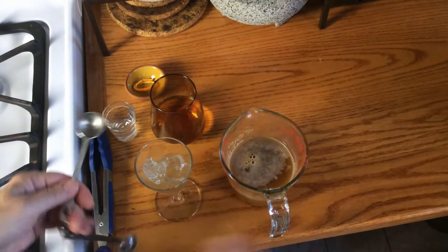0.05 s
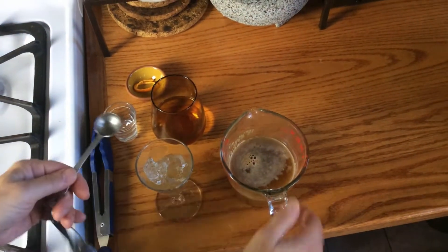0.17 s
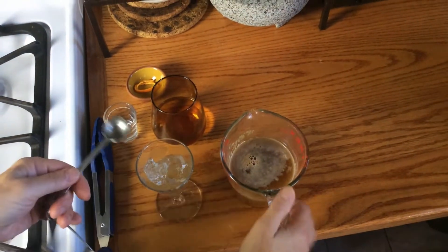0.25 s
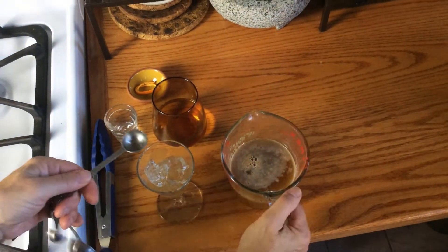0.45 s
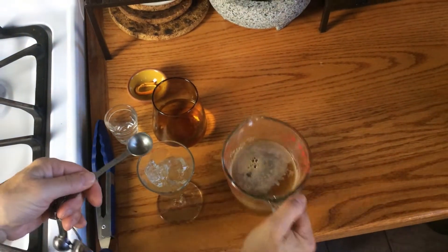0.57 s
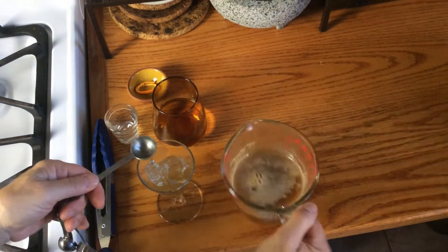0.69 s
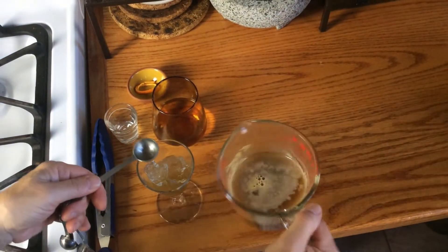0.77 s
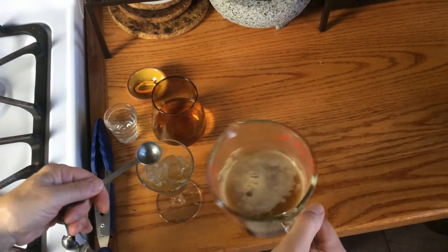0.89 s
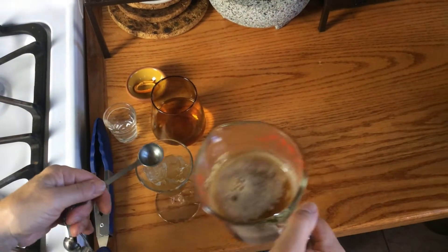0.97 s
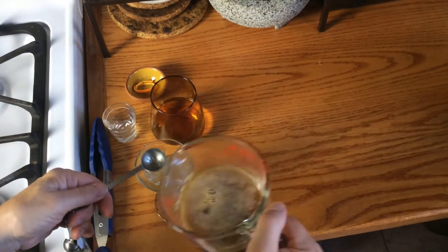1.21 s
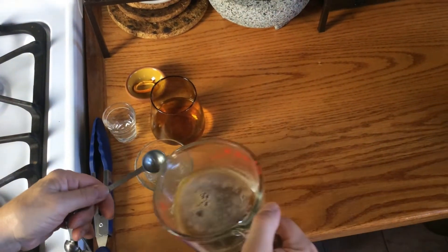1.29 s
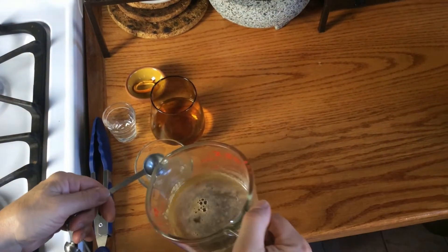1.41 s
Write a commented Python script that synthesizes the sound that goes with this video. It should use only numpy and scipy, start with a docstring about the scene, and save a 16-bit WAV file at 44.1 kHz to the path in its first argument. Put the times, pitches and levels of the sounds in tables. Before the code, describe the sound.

Metal measuring spoons jingle together, light ticks then three bright clinks, over a faint hum.

```python
"""A small kitchen, one microphone close to the counter. Steel measuring spoons swing together on their ring:
light ticks, then three bright clinks. Each contact clacks and sets the spoons ringing, the last loud one
a glass too, and the room answers briefly. Behind them a fridge-like motor hums over the room tone,
and a soft rustle swells as a glass pitcher is lifted."""
import sys
import numpy as np
from scipy import signal
from scipy.fft import rfft, irfft
from scipy.io import wavfile
from scipy.ndimage import uniform_filter1d

SR = 44100
rng = np.random.default_rng(int(sys.argv[2]) if len(sys.argv) > 2 else 0)


def inscribe(sig):
    """Save sig as 16-bit PCM at rate SR to the path in sys.argv[1].

    A 1-D sig is mono; a 2-D sig holds one channel per row.
    Samples are clipped to [-1, 1] before scaling.
    """
    pcm = np.round(np.clip(np.atleast_2d(sig).T, -1, 1) * 32767)
    wavfile.write(sys.argv[1], SR, pcm.astype(np.int16))


N = 63945

# room tone: frequency_hz, relative_db
AIR_SPECTRUM = [(25, -29.5), (45, -12), (80, 1), (130, -4), (210, 1.5), (300, -14.5), (500, -22.5),
                (1100, -25), (1600, -31), (3000, -43), (4000, -37.5), (5500, -46), (9000, -35.5),
                (11500, -46.5), (13000, -52.5), (15000, -79.5)]
# brief swells of its rumble: peak_s, boost_db
RUMBLE_BOOSTS = [(1.015, 12), (1.16, 11.5)]
AIR_DB, RUMBLE_TOP_HZ, RUMBLE_WAVER_DB, SWELL_WIDTH_S = -46, 130, 3.5, 0.023

# the motor's strongest tone: time_s, level_db
HUM_LEVELS = [(0.0, -53), (0.064, -38.5), (0.164, -51.5), (0.424, -36.5), (0.66, -38), (0.84, -49),
              (0.888, -39), (1.05, -45), (1.2, -73), (1.376, -40), (1.45, -50.5)]
# its weaker tones: pitch_hz, level_db
MOTOR_TONES = [(60, -60), (85, -52), (128, -56.5), (214, -53.5)]
HUM_HZ, MOTOR_WAVER_DB, PITCH_DRIFT = 171.6, 2, 0.0137

# colour of the pitcher's rustle: frequency_hz, relative_db
RUSTLE_SPECTRUM = [(150, 4.5), (350, 0), (600, -6), (850, -1), (980, -11), (1120, 1.5), (1300, -10.5),
                   (1500, -12), (2100, -15), (3000, -38), (8000, -43.5), (14000, -57)]
# its swell: time_s, level_db
RUSTLE_SWELL = [(.55, -63), (.8, -52), (1.0, -49), (1.22, -53.5), (1.45, -54)]
# its hollow resonance: time_s, pitch_hz, level_db
HOLLOW_PATH = [(0.698, 950, -73.5), (1.0, 830.4, -63.5), (1.22, 565.6, -52.5), (1.45, 538, -61.5)]
HOLLOW_WIDTH_HZ = 280

# modes of the knocked glass: pitch_hz, relative_db, t60_s
GLASS_MODES = [(1830, 6, 0.019), (3930, 6.5, 0.012), (5544, 12.5, 0.022), (6380, -4, .06)]
# the singing glass wall: start_s, pitch_hz, swell_s, gain_db, t60_s
GLASS_WALL_TONE = (.483, 2824, .026, -20, .1)
GLASS_START_S, GLASS_DB = .48, -27

# modes of the four spoons and the loop they hang on: pitch_hz, relative_db, t60_s
TINY_MODES = [(6380, 7.5, 0.021), (6700, 3.5, 0.035), (6860, 0, 0.04)]
SMALL_MODES = [(8035, 0, .15), (8090, 3, .022), (8112, -7, .11), (10470, -20, .11), (10680, -20, .09),
               (12740, -22, .12), (13518, -7.5, .09)]
MIDDLE_MODES = [(8080, 0, .095), (8295, -13, .1), (9275, -11, .1), (9700, -16, .1), (11430, -17, .11),
                (12770, -17, .08), (13340, -19, .1)]
LARGE_MODES = [(7476, -1, .235), (7563, -21, .2), (8979, -20, .13), (9318, -14, .13), (9372, -16, .14),
               (10385, -16, .17), (10545, -17, .17), (10980, -20, .17), (12490, -21, .07), (12760, -19, .1),
               (13570, -9, .21), (15650, -28, .05)]
LOOP_MODES = [(9200, 1, 0.05), (10150, 3.5, 0.063)]
# steel on steel: start_s, clack_db, low_edge_hz, tiny_db, small_db, middle_db, large_db, loop_db
CONTACTS = [(-.012, -39, 5900, -37, -49.5, -43.5, -73, -60),
            (.0438, -41.5, 8100, -63, -67, -69, -65.5, -51.5),
            (.0708, -29, 5900, -35.5, -49, -61.5, -63, -35.5),
            (.0738, -39, 6000, -47.5, -56, -62, -57.5, -45.5),
            (.1201, -34, 5335, -37.5, -50, -42, -68, -61),
            (.1925, -29.5, 5500, -47.5, -36.5, -52.5, -56.5, -26.5),
            (.2155, -15, 3800, -38, -9, -24, -29, -32), (.23616, -30, 3400, -50, -20, -34, -50, -45),
            (.3738, -18, 4500, -43, -42.5, -15, -54, -42), (.3863, -33, 4700, -50, -45, -25, -54, -45),
            (.4800, -11, 5060, -23.5, -23.5, -38, -10.5, -48.5)]
# colour of clacking and rubbing steel: frequency_hz, relative_db
STEEL_SPECTRUM = [(400, -55), (1200, -20.5), (1700, -7), (2500, -6), (4000, -9), (5000, -8), (6400, -8),
                  (7300, -10.5), (8600, -0.5), (10200, 1.5), (11400, -6.5), (12200, -6.5), (12800, -13),
                  (13600, -8.5), (14600, -21), (16500, -37.5)]
# a spoon rubbing, the second time on the glass: start_s, peak_s, end_s, level_db, low_edge_hz
RUBS = [(.168, .208, .215, -43, 5300), (.512, .53, .562, -41, 3000), (.76, .785, .82, -65, 1500)]
# soft touches on the large spoon: start_s, gain_db
SOFT_TOUCHES = [(0.755, -47.5), (0.778, -51.5)]
# the spoons settling against each other: start_s, length_s, change_db
SETTLINGS = [(.3, .02, -8), (.394, .008, -7), (.538, .024, -12)]
CLACK_RISE_S, CLACK_T60_S, RING_RISE_S = .0007, 0.026, 0.00288
TOUCH_RISE_S, TOUCH_DULL_DB_PER_KHZ = .007, 2.2

ROOM_T60_S, ROOM_DELAY_S, ECHO_LOWPASS_HZ = 0.14, 0.0044, 14340
CLACK_ROOM_DB, RING_ROOM_DB = -0.5, -7
RECORDER_TOP_HZ = 16400


def undb(db):
    """Decibels to gain."""
    return 10 ** (np.asarray(db) / 20)


def unit(x):
    """Scale to rms 1."""
    return x / np.sqrt(np.mean(x ** 2))


def curve(points):
    """Gain over time from (time_s, level_db) points."""
    return undb(np.interp(np.arange(N) / SR, *np.array(points).T))


def lowpass(order, top_hz):
    """Butterworth low-pass sections."""
    return signal.butter(order, top_hz, fs=SR, output="sos")


def colour(x, spectrum, edge_hz=1, shelf_db=-18):
    """Filter by a spectrum, shelved down below the edge; white noise keeps its power."""
    bin_hz = np.maximum(np.arange(N // 2 + 1) * SR / N, 1)
    hz, db = np.array(spectrum).T
    shape = undb(np.interp(np.log(bin_hz), np.log(hz), db))
    shelf = undb(shelf_db) + 1 / (1 + (edge_hz / bin_hz) ** 10)
    return irfft(rfft(x) * unit(shelf * shape), N)


def noise(spectrum):
    """Steady coloured noise of rms 1."""
    return unit(colour(rng.standard_normal(N), spectrum))


def waver(rate_hz):
    """Smooth random wavering of rms 1."""
    hold = int(SR / rate_hz)
    steps = rng.standard_normal(N)[np.arange(N) // hold]
    return unit(uniform_filter1d(uniform_filter1d(steps, hold), hold))


def rise(age, rise_s):
    """Exponential build-up from the blow."""
    return 1 - np.exp(-np.maximum(age, 0) / rise_s)


def fade(age, t60):
    """Exponential decay, silent before the blow."""
    return (age >= 0) * np.exp(-np.log(1000) * np.maximum(age, 0) / t60)


def ring(modes, age, rise_s):
    """Decaying modes that build up over a brief contact."""
    tones = sum(undb(db) * fade(age, t60) * np.sin(2 * np.pi * hz * age) for hz, db, t60 in modes)
    return rise(age, rise_s) * tones


def room_tone(t):
    """Steady hiss over a low rumble that comes in uneven lumps."""
    air = undb(AIR_DB) * noise(AIR_SPECTRUM)
    rumble = signal.sosfiltfilt(lowpass(2, RUMBLE_TOP_HZ), air)
    hiss = air - rumble
    swells_db = sum(db * np.exp(-((t - peak) / SWELL_WIDTH_S) ** 2) for peak, db in RUMBLE_BOOSTS)
    return hiss + rumble * undb(RUMBLE_WAVER_DB * waver(rate_hz=25) + swells_db)


def motor():
    """A motor in the background hums low tones that waver in pitch and level."""
    def tone(hz):
        """One drifting tone of rms 1."""
        pitch_hz = hz * (1 + PITCH_DRIFT * waver(rate_hz=14.19))
        return np.sqrt(2) * np.sin(2 * np.pi * np.cumsum(pitch_hz) / SR)
    hum = curve(HUM_LEVELS) * tone(HUM_HZ)
    return hum + sum(undb(db + MOTOR_WAVER_DB * waver(rate_hz=15)) * tone(hz) for hz, db in MOTOR_TONES)


def kitchen_reflections(sound):
    """A short diffuse room echo, low-passed near 14 kHz."""
    age = np.arange(SR // 2) / SR - ROOM_DELAY_S
    response = rng.standard_normal(len(age)) * fade(age, ROOM_T60_S)
    response = signal.sosfilt(lowpass(10, ECHO_LOWPASS_HZ), response / np.linalg.norm(response))
    return signal.fftconvolve(sound, response)[:N]


def pitcher(t):
    """The lifted pitcher rustles softly; a hollow resonance sinks as it nears the microphone."""
    times, hz, db = np.array(HOLLOW_PATH).T
    slow_noise = unit(signal.sosfilt(lowpass(2, HOLLOW_WIDTH_HZ / 2), rng.standard_normal((2, N))))
    phase = 2 * np.pi * np.cumsum(np.interp(t, times, hz)) / SR
    hollow = slow_noise[0] * np.cos(phase) + slow_noise[1] * np.sin(phase)  # a narrow gliding band
    rustle = curve(RUSTLE_SWELL) * noise(RUSTLE_SPECTRUM)
    return rustle + undb(np.interp(t, times, db)) * hollow


def glass(t):
    """Knocked in the last loud clink, a glass rings; one tone of its wall swells and then dies."""
    knock = undb(GLASS_DB) * ring(GLASS_MODES, t - GLASS_START_S, RING_RISE_S)
    start, hz, swell_s, db, t60 = GLASS_WALL_TONE
    age = t - start
    swell = np.clip(age / swell_s, 0, 1) ** 2
    return knock + undb(db) * swell * fade(age, t60) * np.sin(2 * np.pi * hz * age)


def spoon_touches(t):
    """A soft contact makes no clack and wakes mainly the large spoon's lowest mode."""
    lowest_hz = LARGE_MODES[0][0]
    dulled = [(hz, db - TOUCH_DULL_DB_PER_KHZ * (hz - lowest_hz) / 1000, t60)
              for hz, db, t60 in LARGE_MODES]
    return sum(undb(db) * ring(dulled, t - start, TOUCH_RISE_S) for start, db in SOFT_TOUCHES)


def spoon_rubs(t):
    """A spoon slides, once against the glass, with a brief hiss that follows the pressure."""
    rubs = np.zeros(N)
    for start, peak, end, db, edge_hz in RUBS:
        pressure = np.interp(t, [start, peak, end], [0, 1, 0])
        rubs += undb(db) * colour(pressure * rng.standard_normal(N), STEEL_SPECTRUM, edge_hz)
    return rubs


def spoon_clacks(t):
    """Each collision gives a sharp burst of bright noise."""
    clacks = np.zeros(N)
    for start, db, edge_hz, *_ in CONTACTS:
        age = t - start
        burst = rise(age, CLACK_RISE_S) * fade(age, CLACK_T60_S) * rng.standard_normal(N)
        clacks += undb(db) * colour(burst, STEEL_SPECTRUM, edge_hz)
    return clacks


def spoon_ringing(t):
    """Each collision rings the spoons and their loop; every later settling damps that ringing."""
    parts = (TINY_MODES, SMALL_MODES, MIDDLE_MODES, LARGE_MODES, LOOP_MODES)
    ringing = np.zeros(N)
    for struck, _, _, *parts_db in CONTACTS:
        damping_db = sum(db * np.clip((t - start) / length, 0, 1)
                         for start, length, db in SETTLINGS if start > struck)
        for modes, db in zip(parts, parts_db):
            ringing += undb(db + damping_db) * ring(modes, t - struck, RING_RISE_S)
    return ringing


def scene():
    """In mono: spoons and glass up close with their reflections, over motor, room tone and pitcher."""
    t = np.arange(N) / SR
    clatter = spoon_clacks(t) + spoon_rubs(t)
    ringing = glass(t) + spoon_touches(t) + spoon_ringing(t)
    reflections = kitchen_reflections(undb(CLACK_ROOM_DB) * clatter + undb(RING_ROOM_DB) * ringing)
    background = motor() + room_tone(t) + pitcher(t)
    return (background + reflections + clatter + ringing)[None]


def record(dry):
    """The recorder cuts the highest treble steeply."""
    return signal.sosfilt(signal.ellip(8, .2, 70, RECORDER_TOP_HZ, fs=SR, output="sos"), dry)


dry = scene()
out = record(dry)
inscribe(out)
```